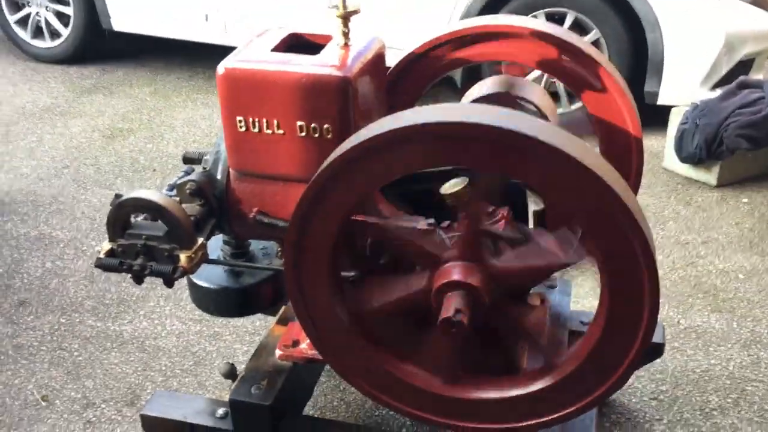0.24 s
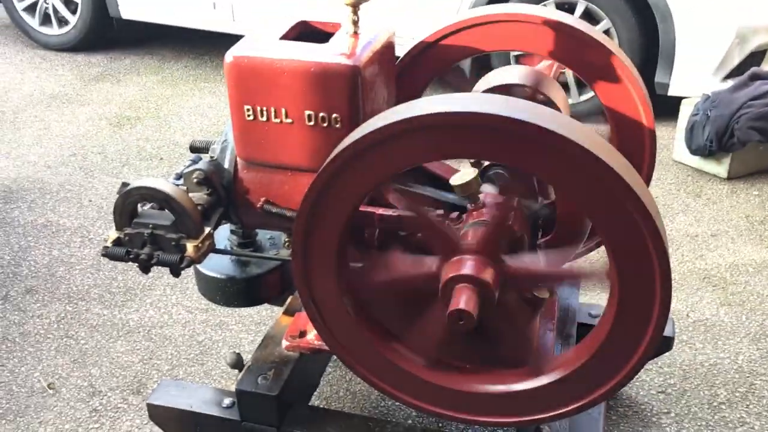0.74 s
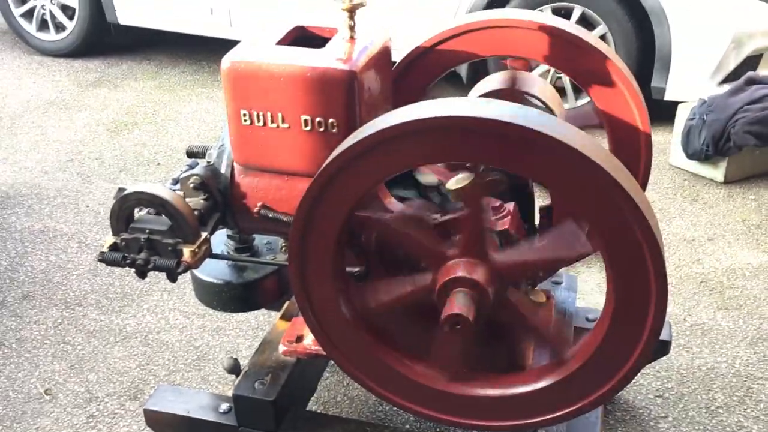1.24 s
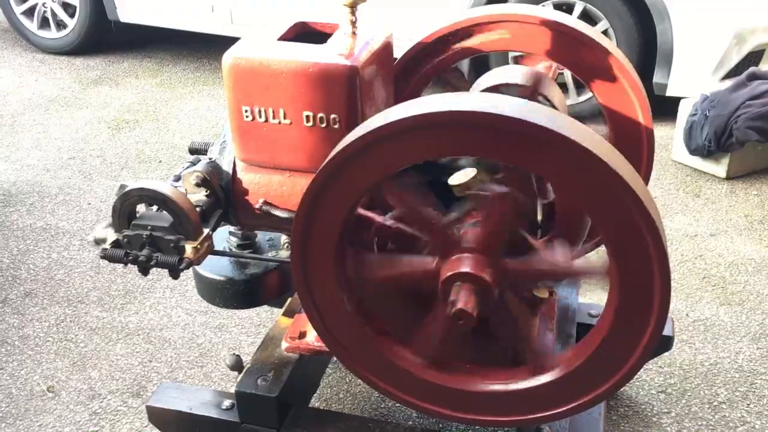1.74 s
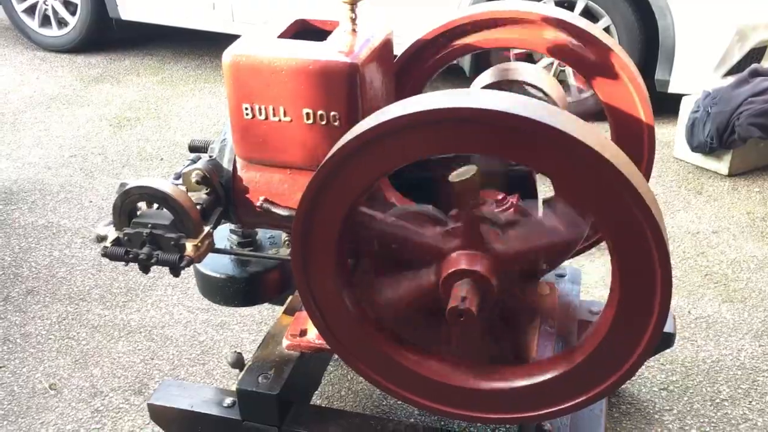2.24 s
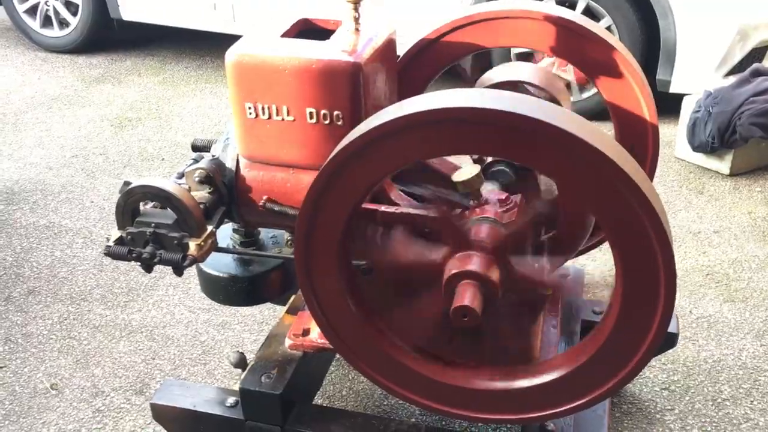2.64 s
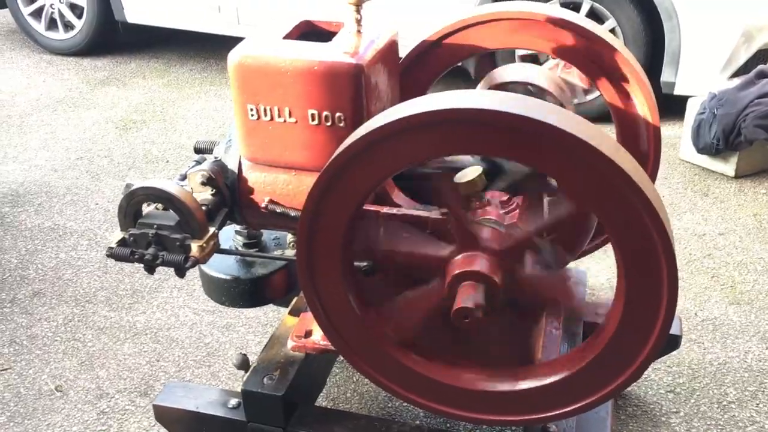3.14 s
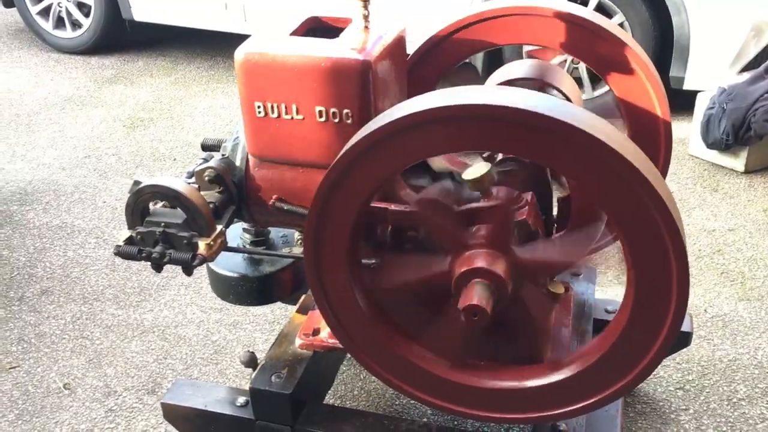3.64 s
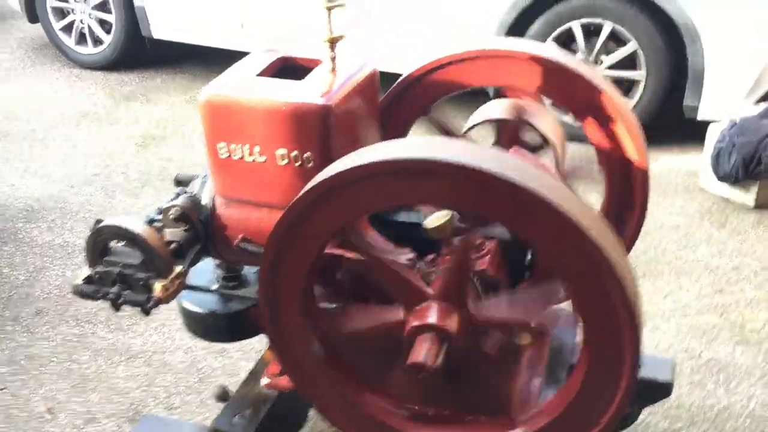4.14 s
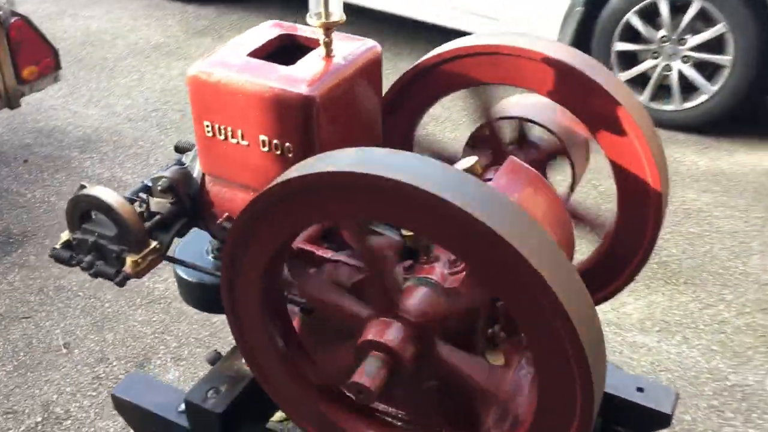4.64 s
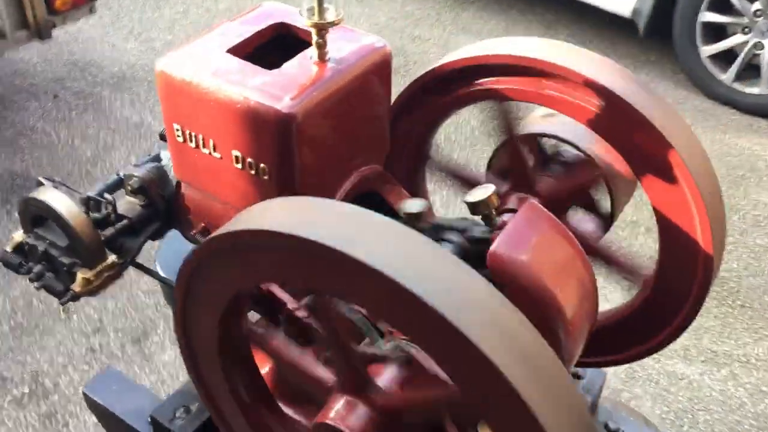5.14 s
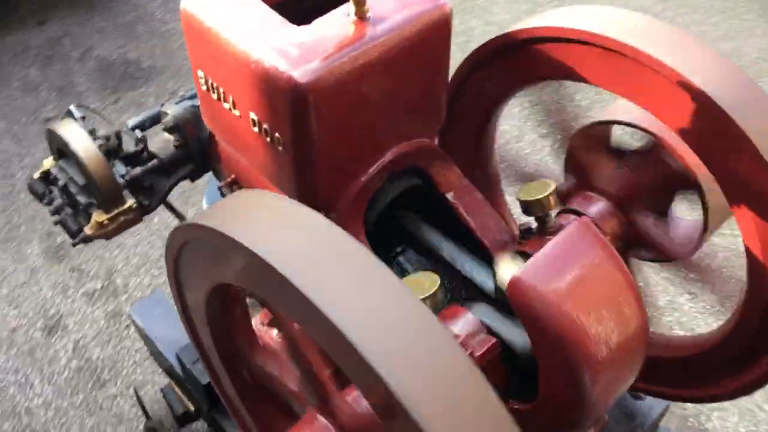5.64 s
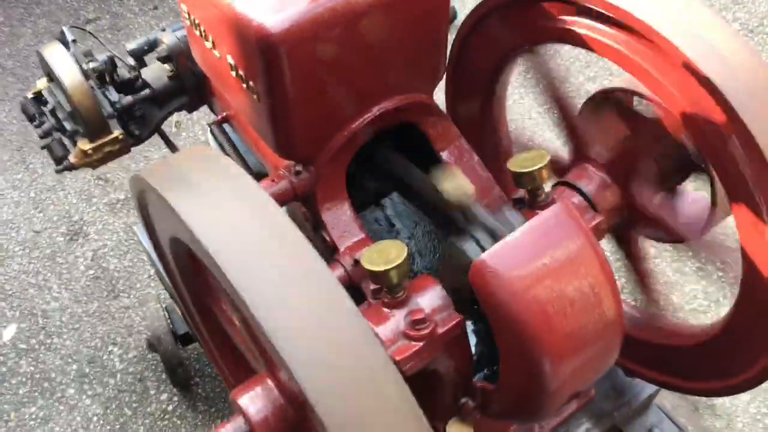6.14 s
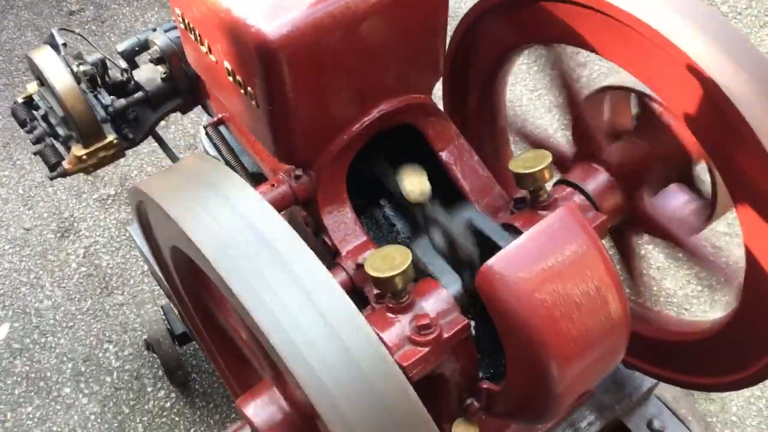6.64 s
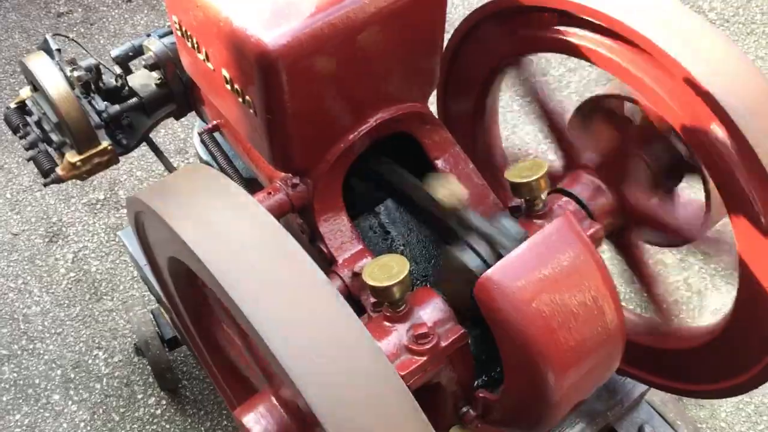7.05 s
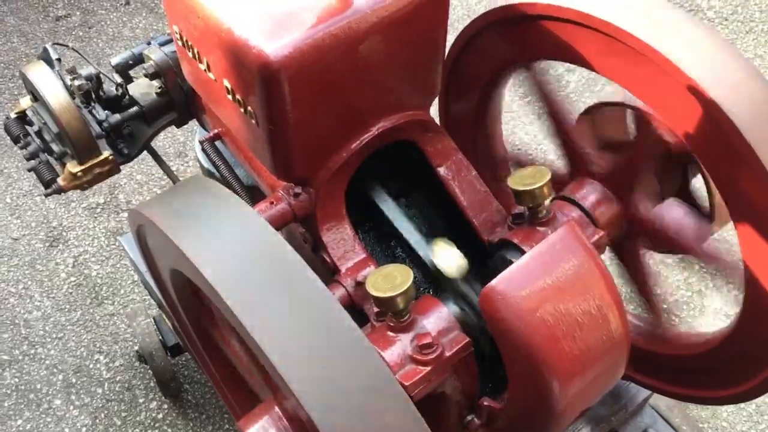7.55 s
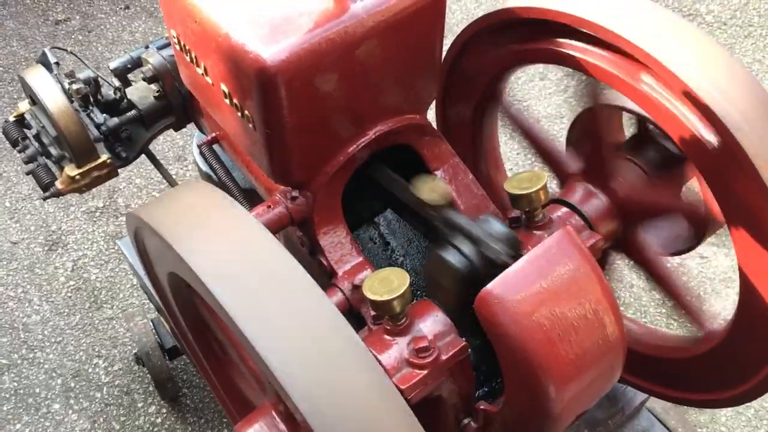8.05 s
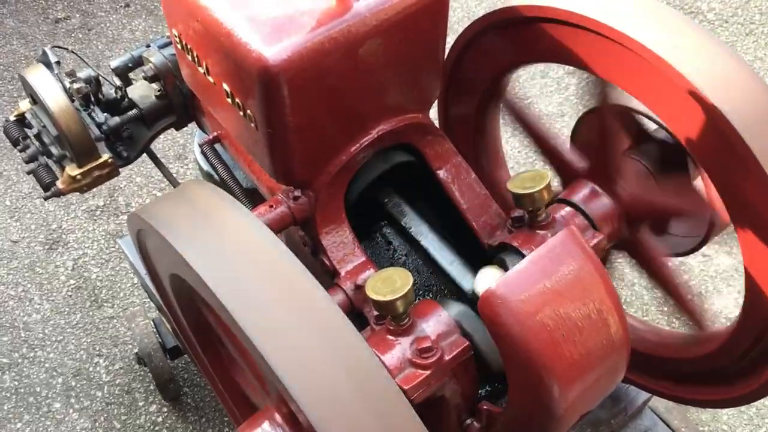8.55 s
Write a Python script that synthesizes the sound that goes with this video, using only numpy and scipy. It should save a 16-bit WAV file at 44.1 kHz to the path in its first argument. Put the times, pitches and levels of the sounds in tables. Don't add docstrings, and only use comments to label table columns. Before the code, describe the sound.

An old flywheel engine coasts in an open yard. Each turn brings a light tick, a soft puff of air and a hard rattling metal clack, roughly three per second. Near two and again past five seconds it gulps air with a fluttering snort, hisses sharply, snaps and gives a short muffled exhaust bark. Wind rumbles on a handheld phone, which moves closer to the open crankcase, so low thuds grow.

```python
import sys
import numpy as np
from scipy import signal
from scipy.fft import rfft, irfft
from scipy.io import wavfile
from scipy.ndimage import uniform_filter1d

SR = 44100
rng = np.random.default_rng(int(sys.argv[2]) if len(sys.argv) > 2 else 0)


def gain_from_decibels(decibels):
    exponent = np.asarray(decibels, float) / 20
    return 10 ** exponent


def unload_wav(signal):
    wavfile.write(
        sys.argv[1],
        SR,
        np.round(np.clip(np.atleast_2d(signal).T, -1, 1) * 32767).astype(np.int16),
    )


N = 388080
TIME = np.arange(N) / SR

# start_s, peak_db, edge_db, bar_ring_db, arm_ring_db
CLACKS = [(0.2076, -2, -4.5, -5, 0.5), (0.5587, -8.5, -5, 1, -1), (0.9378, -3.5, -5.5, 3.5, -1),
          (1.3199, -9.5, -5.5, -3, 5), (1.7434, -4.5, -8.5, -1, -3), (2.5212, -1.5, -6, -1.5, -6),
          (2.801, -1.5, -3.5, 7, 2.5), (3.0991, 1, -4.5, -3, -3.5), (3.4, -2.5, -6, 3.5, -4),
          (3.7218, 1, -8, 4, 4), (4.0467, -5, -10.5, 5.5, -11), (4.3961, -3.5, -3.5, 4.5, 4),
          (4.7487, -7.5, -10, 3, 6), (5.1375, -7, -10.5, 6, 3), (5.8547, -1.5, -6, -20, -1),
          (6.13, -3.5, -4, 1, -6), (6.4208, 1.5, -6, -8, -16), (6.7163, -2.5, -5, -3, -1),
          (7.029, 0, -6.5, -4.5, 3), (7.3466, -4, -7.5, -11.5, 2), (7.6855, -0.5, -5, -13, 0.5),
          (8.0313, -8, -7, -3.5, -4), (8.4012, -3.5, -2, -5, -1), (8.779, -10, -6, -6, 0)]
# start_s, peak_db
CAM_TICKS = [(0.1535, -8), (0.8767, -9), (1.666, -14.5), (3.055, -1.5), (3.672, -3.5), (4.3408, -8.5),
             (5.07, -12.5), (6.3785, -2), (6.981, -5), (7.6329, -5.5), (8.342, -18.5)]
# start_s, peak_db
IDLE_TICKS = [(0.5191, -19), (1.274, -31), (2.771, -15.5), (3.369, -13), (4.011, -17.5), (4.709, -22.5),
              (6.102, -15), (6.6824, -16), (7.299, -38), (7.9932, -20), (8.7295, -23)]
# pitch_hz, level_db, t60_s
ROCKER = [(1920, -5, 0.044), (2490, -0.5, 0.032), (3020, -3.5, 0.022), (3500, 1.5, 0.0098),
          (4320, -5, 0.02), (5390, -5, 0.032), (6020, 1, 0.017), (6450, -8.5, 0.055), (7200, -33.5, 0.12),
          (9450, -15, 0.04), (11880, -9, 0.025), (15200, -20, 0.024)]
# pitch_hz, level_db
SCRAPE = [(290, -24.5), (500, -5.5), (784, -7), (1620, -7.5), (2430, -0.5), (4210, -16.5), (5630, -15),
          (11100, -23), (12500, -23), (16000, -20)]
# pitch_hz, level_db
YARD = [(71, -18.5), (120, -14), (278, 5.5), (757, -6.5), (988, -8.5), (1140, -10), (2070, -10),
        (2380, -12), (4880, -20), (9400, -18.5), (16000, -18)]
# start_s, level_db, length_s
BARKS = [
    (2.445, -18, 0.053),
    (5.78, -17.5, 0.066),
]
# start_s, thud_db, air_puff_db, gear_scrape_db
CLOSER = [
    (0, -29, -32.5, -31.5),
    (4.4, -15, -35, -30.5),
    (6.2, 3, -39, -28.5),
    (8.8, 1.5, -39, -29),
]


def noise(spectrum):
    hz, db = np.transpose(spectrum)
    f = np.maximum(np.arange(N // 2 + 1) * SR / N, 1)
    colour = gain_from_decibels(np.interp(np.log(f), np.log(hz), db, left=-90, right=-90))
    y = irfft(rfft(rng.standard_normal(N)) * colour, N)
    return y / y.std()


def blows(s, db, rise, t60):
    x = np.zeros(N)
    at = np.round(np.asarray(s) * SR).astype(int)
    np.add.at(x, at[at < N], gain_from_decibels(db)[at < N])
    up = np.exp(-1 / (max(rise, 1e-4) * SR))
    down = np.exp(-np.log(1000) / (t60 * SR))
    decay = signal.lfilter([1], [1, -down], x + 1e-12)
    return signal.lfilter([1 - up], [1, -up], decay)


def tent(s, db, up_db_s, down_db_s):
    return gain_from_decibels(db - up_db_s * np.maximum(s - TIME, 0) - down_db_s * np.maximum(TIME - s, 0))


def walk(rate):
    k = int(SR / rate)
    held = np.repeat(rng.standard_normal(N // k + 1), k)
    return 1.54 * uniform_filter1d(held, k)[:N]


def track(tables, column, rest=-120.):
    out = np.full(N, rest)
    for rows in tables:
        rows = np.array(rows)
        on = (TIME >= rows[0, 0]) & (TIME <= rows[-1, 0])
        out[on] = np.interp(TIME[on], rows[:, 0], rows[:, column])
    return out


def ring(force, hz, t60):
    pole = np.exp(2j * np.pi * hz / SR - np.log(1000) / (max(t60, .004) * SR))
    push = force.imag - np.r_[0, (force * np.conj(pole)).imag[:-1]]
    return signal.lfilter([1], [1, -2 * pole.real, abs(pole) ** 2], push)


def rubbed(modes, force, patchy_db):
    out = 0
    for hz, db, t60 in modes:
        mode = ring(force * rng.standard_normal(N), hz, t60) / np.sqrt(max(t60, .004) * SR / 20)
        out = out + gain_from_decibels(db + patchy_db * walk(20)) * mode
    return out


def struck(modes, s, db, chatter, scatter_db, rub=0, edge_db=0, bar_db=0, arm_db=0):
    lag, lag_db = np.transpose(chatter)
    luck = rng.standard_normal((len(s), len(lag), 1 + 2 * len(modes)))
    at = np.minimum(((s[:, None] + lag * (1 + .15 * luck[..., 0])) * SR).astype(int), N - 1)
    out = np.zeros(N)
    for k, (hz, gain_db, t60) in enumerate(modes):
        force = rub * rng.standard_normal(N) + 0j if np.ndim(rub) else np.zeros(N, complex)
        on_bar, on_arm = 2150 < hz < 2400, 1150 < hz < 1400
        blow_db = db + edge_db * (hz > 3500) + bar_db * on_bar + arm_db * on_arm
        seated = bool(np.ndim(bar_db)) and (on_bar or on_arm)
        touch_db = lag_db + seated * (5 - 14 * (lag > 0))
        size = gain_from_decibels(blow_db[:, None] + touch_db + scatter_db * luck[..., 1 + 2 * k])
        np.add.at(force, at, size * np.exp(2j * luck[..., 2 + 2 * k]))
        out += gain_from_decibels(gain_db) * ring(force, hz, t60)
    return out


def spit(share):
    rate_hz, spurt_db, decay_s = 120, 4.0, .0015
    size = gain_from_decibels(spurt_db * np.minimum(rng.exponential(size=N), 2.5))
    starts = (rng.random(N) < rate_hz / SR) * size
    return 1 + share * signal.lfilter([1], [1, -np.exp(-1 / (decay_s * SR))], starts)


def background():
    return noise(YARD) * gain_from_decibels(-55.5 + 0.66 * walk(6.2))


def wind():
    # start_s, level_db
    breeze = [(0.0, -39), (1.5, -45), (1.68, -27.5), (2.15, -29.5), (2.27, -48), (2.4, -31.5), (3.0, -40.5),
              (3.24, -52), (4.2, -45.5), (5.1, -47.5), (6, -52), (8.5, -66.5), (8.8, -52)]
    # start_s, level_db
    gusts = [(0.19, -26), (0.49, -40.5), (0.76, -40.5), (0.86, -36), (1.06, -37), (1.26, -33), (2.18, -25),
             (2.35, -24.5), (2.62, -30.5), (2.95, -37), (3.14, -37.5), (3.72, -30.5), (4.01, -50),
             (4.25, -33.5), (4.44, -37), (4.68, -35.5), (4.88, -47.5), (5.01, -47.5), (5.27, -24.5),
             (5.81, -33), (6.07, -53), (6.22, -60), (6.43, -45), (6.54, -41.5), (6.66, -39), (6.99, -43),
             (7.32, -56), (7.47, -54), (7.69, -46), (7.94, -48), (8.33, -43), (8.73, -41.5)]
    blow = gain_from_decibels(track([breeze], 1)) + sum(tent(s, db, 170, 210) for s, db in gusts)
    draught = gain_from_decibels(np.interp(TIME, *np.transpose(CLOSER)[:2]) - 55.5)
    rumble = noise([(25, -25), (40, -0.5), (58, 1.0), (85, -2), (130, -9), (220, -22.5)])
    rumble = rumble * blow * gain_from_decibels(-1.0 + 1.8 * walk(12))
    flutter = noise([(90, -25.0), (130, -3.0), (260, -5.0), (700, -23.5)])
    flutter = flutter * (blow * gain_from_decibels(-13.0) + draught) * gain_from_decibels(4.5 * walk(35))
    return rumble + flutter


def thumps():
    # start_s, peak_db, pitch_hz, t60_s, fall_octaves_per_s
    hollow_notes = [(.05, -28, 200, .05, 10), (.17, -23, 150, .08, 5), (.297, -23, 169, .05, 10),
                    (.465, -27, 140, .06, 5), (1.24, -10, 117, 0.052, 7.4), (1.814, -20, 267, 0.18, 39.5),
                    (1.828, -17, 150, .06, 10), (1.881, -22, 250, .04, 20), (1.985, -20, 200, .05, 15),
                    (1.97, -26, 200, 0.087, 8.5), (2.09, -20, 68.5, .12, 2), (2.123, -22.5, 300, 0.069, 7),
                    (2.143, -11, 400, 0.12, 139), (2.325, -10.5, 160, 0.038, 12),
                    (2.368, -11, 141, 0.044, 28), (2.384, -16.5, 251, .04, 28),
                    (2.559, -18, 247, 0.055, 19), (2.491, -14, 347, 0.14, 2.5),
                    (2.628, -8.5, 140, 0.039, 29), (2.725, -18, 208, 0.055, 62), (5.211, -16, 279, 0.11, 0),
                    (5.478, -20.5, 300, 0.064, -6), (5.49, -28, 405, 0.18, 2), (5.643, -28, 292, 0.2, 1),
                    (5.672, -21, 300, .05, 10), (5.778, -15.5, 200, 0.086, 3), (5.789, -17, 400, 0.056, 7),
                    (5.816, -16, 346, 0.12, 2)]
    out, t = np.zeros(N), TIME[:SR // 4]
    for s, db, hz, t60, fall in hollow_notes:
        cycles = np.cumsum(hz * 2 ** (-fall * t)) / SR
        envelope = gain_from_decibels(db - 60 * t / t60) * (1 - np.exp(-t / 0.00054))
        out[int(s * SR):int(s * SR) + len(t)] += envelope * np.sin(2 * np.pi * cycles)
    return out


def taps():
    # start_s, peak_db
    tap_times = [(0.1295, -23.5), (0.4988, -35), (0.695, -29), (0.851, -25.5), (1.642, -25.5),
                 (3.033, -20.5), (3.3523, -32), (3.6494, -22.5), (3.977, -38), (4.3168, -23),
                 (4.588, -39.5), (4.6618, -40), (4.6788, -30), (4.8922, -29), (4.99, -39.5), (5.0432, -23),
                 (5.415, -21.5), (6.357, -21), (6.853, -38), (6.879, -34.5), (6.9598, -22), (7.2739, -33.5),
                 (7.6102, -20.5), (7.9718, -35), (8.318, -24)]
    # pitch_hz, level_db, t60_s
    follower = [(900, -5.5, .02), (1497, -0.5, .03), (1700, -8.5, .02), (2450, -10, 0.024),
                (3000, -5.5, .02), (3600, -8, .015)]
    s, db = np.transpose(tap_times)
    tap = struck(follower, s, db - 7.5, [(0, -1.5), (.002, -2.5), (.006, -5.5)], scatter_db=3.5)
    return tap + noise(SCRAPE) * blows(s, db - 11, 0.0028, 0.11)


def intake():
    # start_s, length_s, rush_db, flutter_db
    intakes = [
        (1.832, 0.2, -27, -33),
        (5.219, 0.18, -24.5, -22.5),
    ]
    # share_of_length, rush_db, flutter_db, flutter_rate_hz
    gulp = [
        (0, -31, 0, 48.4),
        (.05, -4, -2, 47.9),
        (.36, -1, -0.5, 46.1),
        (.65, -6.5, -1.5, 45.3),
        (1, -27, -25.5, 41),
    ]
    # pitch_hz, level_db
    rush_colour = [(240, -19), (400, -12.5), (949, -12.5), (1130, -4.5), (1380, -10.5), (2360, -2),
                   (2840, -4.5), (4880, -8), (5600, -9), (16000, -16)]
    gulps = [[(s + share * length, rush_db + a, flutter_db + b, hz) for share, a, b, hz in gulp]
             for s, length, rush_db, flutter_db in intakes]
    cycles = np.cumsum(track(gulps, 3, rest=0.)) / SR
    for s, *_ in intakes:
        cycles = cycles - (TIME >= s) * cycles[int(s * SR)]
    phase = (cycles - 0.0025) * (2 * np.pi)
    flap = .6 * np.sin(phase) + 0.3 * np.sin(2 * phase + 0.45)
    flap = flap + 0.69 * np.sin(4 * phase + .3) + 0.28 * np.sin(6 * phase)
    rush = noise(rush_colour) * gain_from_decibels(track(gulps, 1) + 1.8 * flap + 2.0 * walk(200)) * spit(.35)
    return rush + flap * gain_from_decibels(track(gulps, 2) + 3.7 * walk(90))


def leak():
    # intake_shuts_s, top_of_stroke_s, whistle_db, blast_db, whistle_lasts_s
    firings = [
        (1.769, 2.29, -13, -14.5, 0.022),
        (5.156, 5.64, -12.5, -14, 0.03),
    ]
    # pitch_hz, level_db
    whistle_colour = [(6000, -26), (9500, -13), (11200, -6), (12400, 1), (13600, -6), (14900, 1),
                      (16500, -2)]
    blast_colour = [(700, -14.5), (1500, -13.5), (2300, -11.5), (3300, -4), (4500, -12), (6000, -4.5),
                    (8000, -7.5), (11000, -6.5), (16500, -3)]
    compression_s, seal_s = .23, .045
    whistle, blast = 0, 0
    for (shut, top, whistle_db, blast_db, lasts), (bark, *_) in zip(firings, BARKS):
        sealed = np.clip((TIME - top + compression_s) / seal_s, 0, 1) ** 2
        opens = bark + 0.02
        peak = gain_from_decibels(whistle_db) * np.exp(-((TIME - top) / lasts) ** 2)
        whistle = whistle + sealed * tent(top, -27, 75, 84) + peak
        whistle = whistle + tent(shut, -38.5, 600, 120) * (TIME < shut + .055)
        whistle = whistle + tent(opens, -24.5, 300, 480) * (TIME > bark)
        blast = blast + tent(top, blast_db, 254, 340) + tent(top, -35.5, 110, 150)
        blast = blast + tent(opens, -25.5, 300, 560) * (TIME > bark)
    hiss = noise(whistle_colour) * whistle + noise(blast_colour) * blast
    return hiss * gain_from_decibels(1.0 * walk(150)) * spit(.12)


def igniter():
    # start_s, level_db
    snaps = [
        (2.2349, 1),
        (5.5828, 2),
    ]
    snap_hz = 6500
    t = TIME[:SR // 500]
    pulse = np.sin(2 * np.pi * snap_hz * t) * np.exp(-t * snap_hz * 1.3)
    out = np.zeros(N)
    for s, db in snaps:
        out[int(s * SR):int(s * SR) + len(t)] = gain_from_decibels(db) * pulse
    return out


def exhaust():
    # pitch_hz, width_hz, level_db, late_s
    muffler = [(300, 590, -5, 0.001), (610, 400, -11, 0.), (1310, 620, -2.5, 0.0073),
               (2550, 210, 3, 0.0049), (2940, 310, 2.5, 0.012), (3290, 540, 0, 0.024)]
    out, rasp = np.zeros(N), gain_from_decibels(2.0 * walk(500))
    for hz, width, gain_db, late in muffler:
        half = width / 2
        band = noise([(max(hz - width, 60), -22), (hz - half, -3), (hz, 0), (hz + half, -3), (hz + width, -22)])
        for s, db, length in BARKS:
            share = np.clip((TIME - s - late) / (length - late), 0, 1)
            out += gain_from_decibels(db + gain_db) * band * rasp * np.sin(np.pi * share ** 0.29)
    return out


def stroke():
    turn_db = [1, -1, -1, -2, 0, 0, -1, 1, 1.5, -1, 1.5, -1, -4.5, 1.5, -0.5, -0.5, 0.5, -1, 0, -0.5, 0, 1,
               -1, -0.5]
    # pitch_hz, level_db
    puff_colour = [(71, -52.5), (120, -29), (183, -10), (301, -6.5), (387, 6), (447, -10), (547, -3.5),
                   (748, -7.5), (900, -32.5), (1170, -29.5), (1980, -120)]
    # pitch_hz, level_db, t60_s
    castings = [(1017, 2, 0.046), (1304, -2.5, 0.035), (2362, 1, 0.093), (2507, 0, 0.048),
                (2630, -12, 0.029), (2830, -3, 0.023), (4240, -17.5, 0.014), (4580, -12.5, 0.046),
                (5800, -17.5, 0.057), (7310, -11, 0.013), (9260, -9, 0.02), (9900, -11, 0.027),
                (12600, -9, .009)]
    # share_of_turn, level_db
    gear_load = [
        (0, 1.5),
        (.15, -27),
        (.3, -14),
        (.54, -14),
        (.62, -25),
        (.7, -23),
        (.8, -7),
        (.92, -0.5),
        (1, 2),
    ]
    s = np.transpose(CLACKS)[0]
    gap = np.diff(s)
    turn = np.minimum(np.r_[gap[0], gap], np.r_[gap, gap[-1]])
    near_s, *near_db = np.transpose(CLOSER)
    thud_db, puff_db, scrape_db = (np.interp(s, near_s, column) for column in near_db)
    scrape_db = scrape_db - 62.5 * (turn - 0.28)

    port = rubbed([(391, -4, .12)], 1., patchy_db=1.6)
    puff = (noise(puff_colour) + port) * gain_from_decibels(1.6 * walk(40))
    puff = puff * blows(s - .068, puff_db + turn_db + 6.0, 0.024, 0.25)
    thud = noise([(110, -47.0), (160, -2.0), (250, -2.5), (330, -4.5)])
    thud = thud * blows(s - .06, thud_db + turn_db - 26.0, 0.027, 0.25)
    thud = thud + rubbed([(1020, 0.5, .09)], blows(s - .05, thud_db - 34, .03, .3), patchy_db=2.2)

    touch = np.sort(np.transpose(CAM_TICKS + IDLE_TICKS)[0])
    touch = np.maximum(touch[np.searchsorted(touch, s) - 1], s - .08)
    drag = blows(touch, scrape_db - 0.5, 0.0024, 0.22) + blows(s - .07, scrape_db - 10, 0.037, 0.4)
    slip_rate_hz, slip_db = 300, 3.5
    slips = (rng.random(N) < slip_rate_hz / SR) * gain_from_decibels(slip_db * rng.exponential(size=N))
    even = noise(SCRAPE) * gain_from_decibels(3.0 * walk(150)) * drag
    drag = even + rubbed(ROCKER, gain_from_decibels(8) * slips * drag, patchy_db=3.0)

    turns = np.interp(TIME, np.r_[2 * s[0] - s[1], s, 2 * s[-1] - s[-2]], np.arange(len(s) + 2))
    load = gain_from_decibels(np.interp(turns % 1, *np.transpose(gear_load)))
    gears = noise(YARD) * load * gain_from_decibels(-42.0) + rubbed(castings, load * gain_from_decibels(-43.5), patchy_db=2.2)
    return puff + thud + drag + gears


def ticks():
    # start_s, peak_db
    rattles = [(1.987, -20), (2.018, -19), (2.0467, -21), (2.725, -32), (3.064, -10), (5.281, -16),
               (6.391, -13), (6.993, -12), (0.8895, -16), (0.1653, -12.5), (0.9128, -17), (0.933, -29),
               (1.683, -21.5), (2.488, -7), (2.7596, -26), (3.998, -26), (4.3548, -16.5), (5.0829, -18),
               (5.1056, -15), (5.12, -17), (5.532, -14.5), (5.601, -19), (5.668, -1), (5.824, -6),
               (6.093, -25), (6.692, -16), (7.3115, -15.5), (7.646, -15.5), (7.981, -27), (8.1214, -32.5),
               (8.3562, -12.5), (8.3798, -20), (8.4366, -27)]
    # first_firing_s, second_firing_s, peak_db, treble_db, body_db
    firing_ticks = [(1.745, 5.136, -16, -46, 2), (1.8484, 5.236, -15, -7.5, -29),
                    (1.999, 5.365, -10, -10, -10), (2.1036, 5.4658, -23, -25, -5.5),
                    (2.2374, 5.5855, -4, -8.5, -19.5)]
    rows = [(s, db, -12.5, -14) for s, db in IDLE_TICKS]
    rows += [(s - 0.035, -46.5, -30.5, -4) for s, _ in IDLE_TICKS]
    rows += [(s, db, -12, -13.5) for s, db in rattles]
    rows += [(s, *tint) for first, second, *tint in firing_ticks for s in (first, second)]
    rows += [(s, db, -6.5 + 2.1 * db, -19) for s, db in CAM_TICKS]
    return np.array(rows)


def valve_gear():
    # pitch_hz, level_db, t60_s
    frame_modes = [(947, -9, 0.14), (1270, -9, 0.21), (1424, -1, 0.08), (1703, 4, 0.026)]
    bounce_s = .012
    s, db, treble_db, body_db = ticks().T
    crack = blows(s, db + treble_db, 0.00028, 0.025)
    crack = crack + blows(s + bounce_s, db + treble_db - 11.5, 0.0011, 0.048)
    crack = noise([(4000, -9.5), (7000, 3.5), (15800, -7)]) * crack
    rocker = struck(ROCKER, s, db - 17.5, [(0, 0), (.002, -4), (.005, -8), (bounce_s, -4)], scatter_db=4.5)
    frame = struck(frame_modes, s, db + body_db - 10.5, [(0, 1.5), (.004, -0.5)], scatter_db=0.5)
    tail = noise(SCRAPE) * blows(s, db - 21.0, 0.0045, 0.19)
    return crack + rocker + frame + tail


def latch():
    # start_s, peak_db, edge_db, bar_ring_db, arm_ring_db
    knocks = [(1.4242, -39, -11, -3, -6), (1.449, -19, -31, 1, -6), (2.048, -17.5, -27, -3, 5),
              (2.332, -1, -9.5, 5, 2.5), (2.355, -5.5, -8, -2.5, 2.5), (5.6736, -2, -14.5, -6, 8),
              (5.696, -14, -10, -6.5, 3), (6.0052, -23.5, -23, -3, 1)]
    # start_s, peak_db
    rebounds = [(0.2218, -14), (0.582, -21.5), (0.9553, -22), (1.3356, -27.5), (1.7605, -38),
                (2.5385, -14.5), (2.8197, -14.5), (3.12, -12), (3.4191, -18.5), (3.7487, -14), (4.06, -20),
                (4.411, -15.5), (4.763, -19.5), (5.1665, -28), (5.8746, -12), (6.1435, -14),
                (6.4475, -12.5), (6.7371, -15), (7.0518, -10.5), (7.3675, -20), (7.7131, -21.5),
                (8.051, -25.5), (8.414, -27)]
    # pitch_hz, level_db, t60_s
    latch_modes = [(1010, -20.5, 0.063), (1254, -22.5, 0.32), (1478, -19, 0.089), (1765, -19, 0.11),
                   (2318, -5, 0.19), (2370, -15, .1), (2437, -13, 0.054), (2580, -18.5, 0.069),
                   (2718, -1.5, 0.083), (2840, -0.5, 0.017), (2993, -3, 0.055), (3174, -14, 0.071),
                   (3410, -25, 0.11), (3420, -21, 0.19), (3693, -10, 0.049), (3917, 3.5, 0.017),
                   (4163, 1, 0.019), (4520, -13.5, 0.07), (4630, -25, .07), (5030, -35.5, 0.074),
                   (5250, -17, 0.1), (5740, -17, 0.098), (5850, 0.5, 0.02), (6260, -15.5, 0.028),
                   (9600, -8.5, 0.016), (10150, -11, 0.023)]
    # pitch_hz, level_db
    clang = [(290, -53), (500, -11.5), (1130, -55.5), (1260, -6), (1620, -12), (2730, 6.5), (3250, 1),
             (5880, -11.5), (6900, -16.5), (9920, -41), (16000, -37)]
    s = np.transpose(CLACKS)[0]
    turn = np.minimum(np.diff(s, append=N / SR + .3), .38)
    spring = noise([(2000, -20.5), (5000, 3.5), (9000, 7.5), (15500, -5.5)])
    spring = spring * blows(s + .238 * turn, -49 + 1.5 * rng.standard_normal(len(s)), 2e-4, 0.11)

    jumps = [(s, db + 0.5, -9.5, -4, -4) for s, db in rebounds]
    s, db, edge_db, bar_db, arm_db = np.transpose(CLACKS + knocks + jumps)
    rattle = blows(s, db - 45.5, 0.0024, 0.073) * gain_from_decibels(5.37 * walk(300))
    chatter = [(0, -1.5), (.0013, 1.5), (.0028, -3), (.0045, -3.5), (.009, -15.5), (.013, -19), (.036, -24.5)]
    hit = struck(latch_modes, s, db - 17, chatter, scatter_db=3.0, rub=rattle,
                 edge_db=edge_db + 8, bar_db=bar_db, arm_db=arm_db)
    hit = signal.sosfilt(signal.butter(2, 8000, fs=SR, output="sos"), hit)
    smear = noise(clang) * (blows(s, db - 15.0, 0.00077, 0.045) + blows(s, db - 27.5, 0.0044, 0.17))
    return hit + smear + spring


def scene():
    firing = intake() + leak() + igniter() + exhaust()
    engine = taps() + firing + stroke() + valve_gear() + latch()
    t = np.arange(int(.4 * SR)) / SR
    echo = rng.standard_normal(len(t)) * gain_from_decibels(-60 * t / 0.29) * (t > .004)
    wet = signal.fftconvolve(engine, echo / np.sqrt(np.sum(echo ** 2)))[:N]
    return (engine + gain_from_decibels(-19.0) * wet + thumps() + wind() + background())[None]


def top_cut(x):
    return signal.sosfilt(signal.butter(12, 16980, fs=SR, output="sos"), x)


def record(dry):
    ceiling = 1.02
    x = signal.sosfilt(signal.butter(3, 36, "high", fs=SR, output="sos"), dry)
    x = ceiling * np.tanh(x / ceiling)
    x = signal.sosfilt(signal.ellip(8, .2, 60, 15900, fs=SR, output="sos"), x)
    return top_cut(x)


dry = scene()
out = record(dry)
unload_wav(out)
```